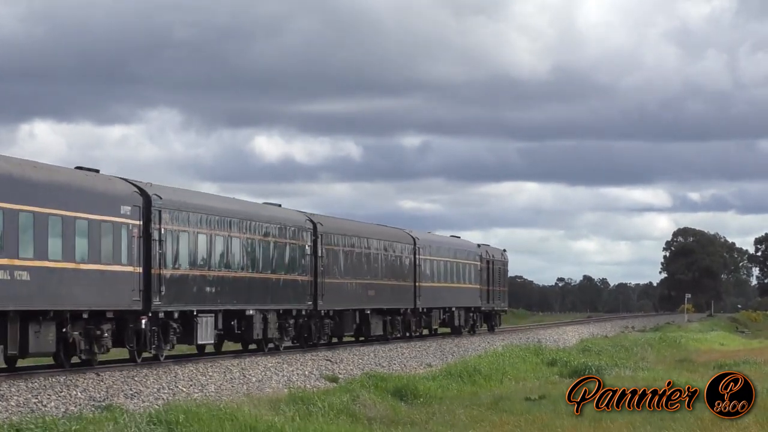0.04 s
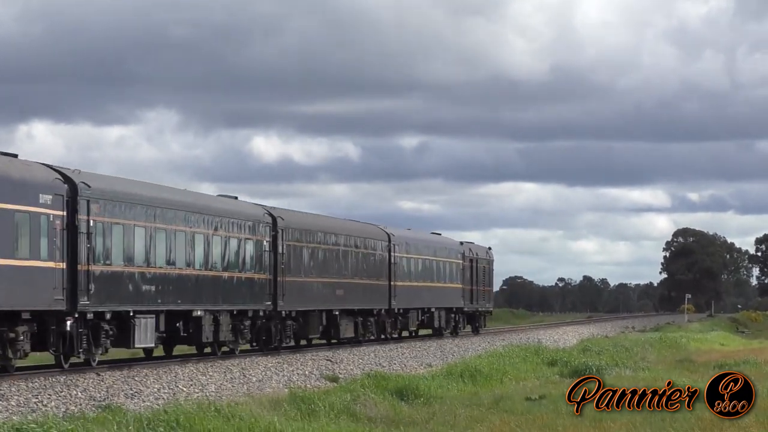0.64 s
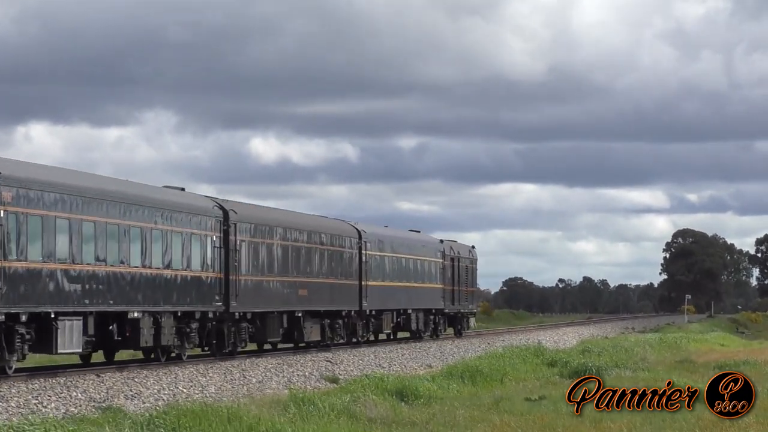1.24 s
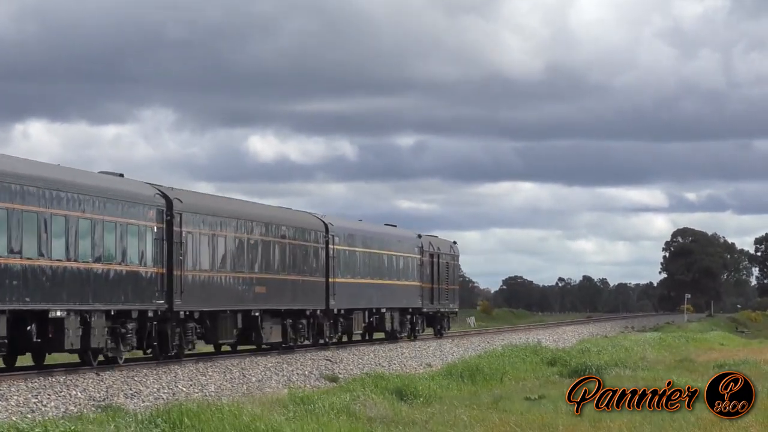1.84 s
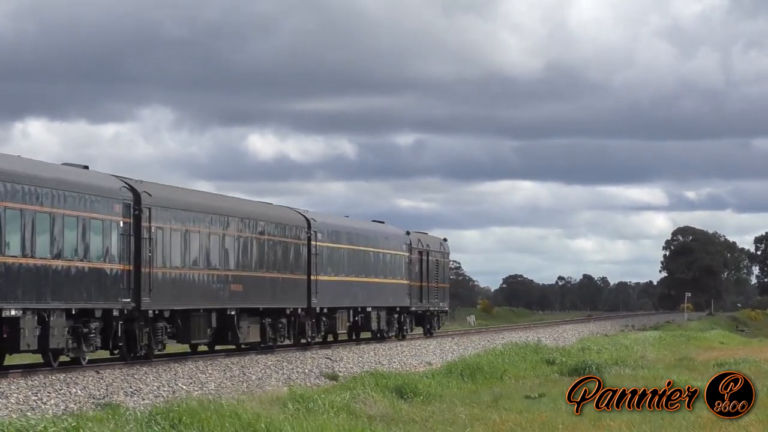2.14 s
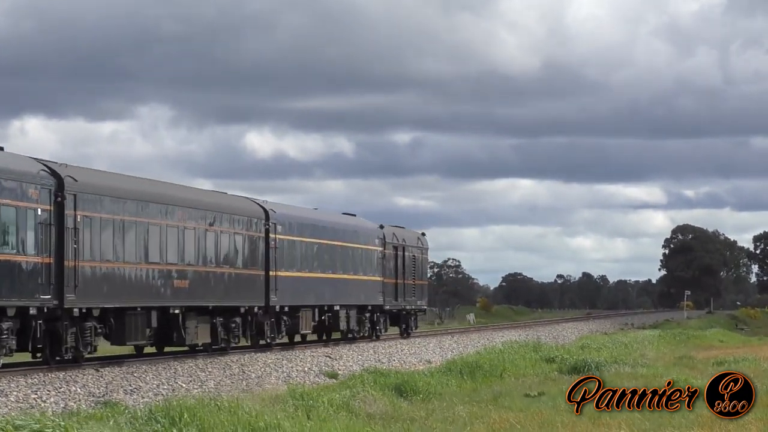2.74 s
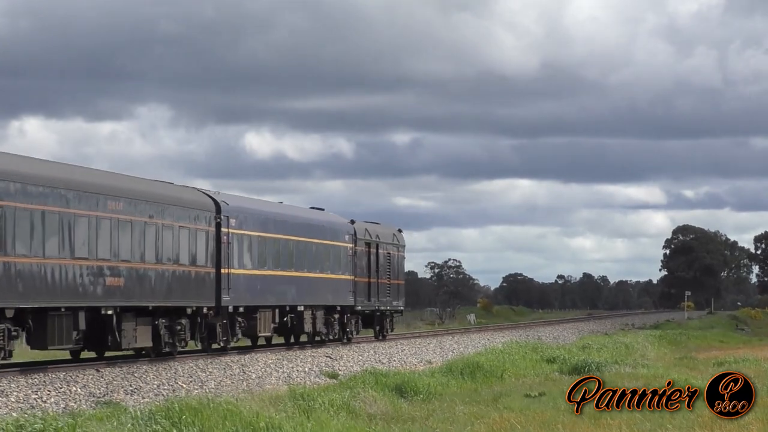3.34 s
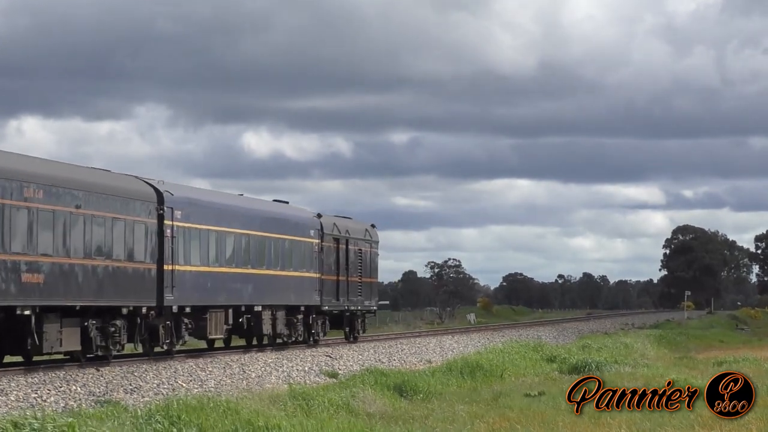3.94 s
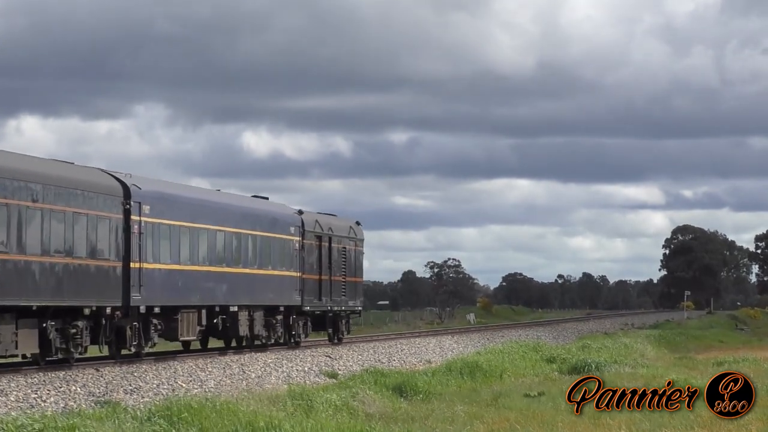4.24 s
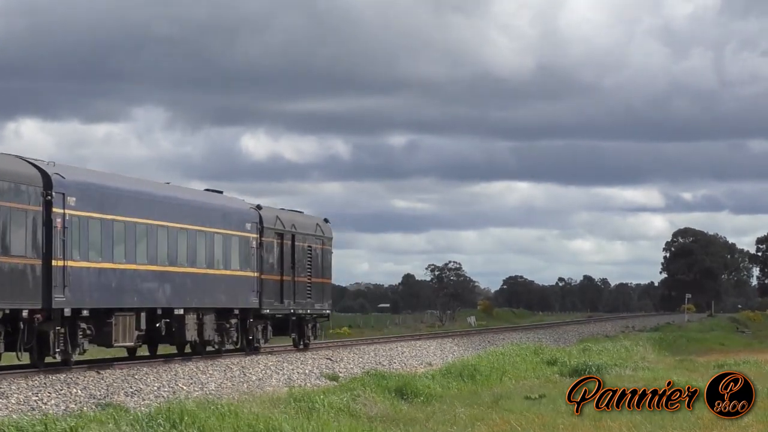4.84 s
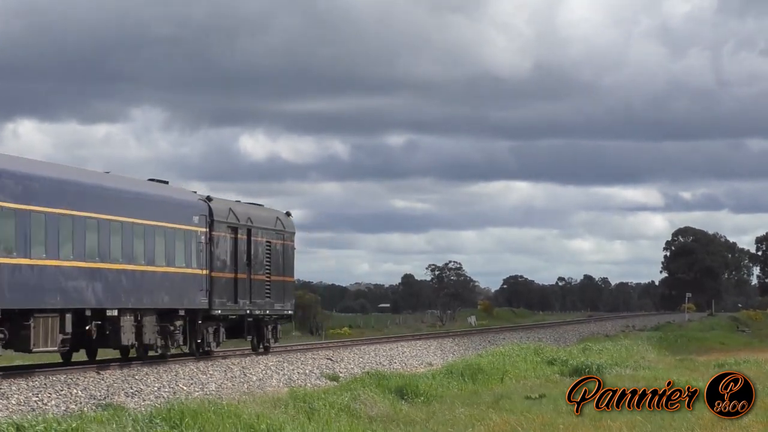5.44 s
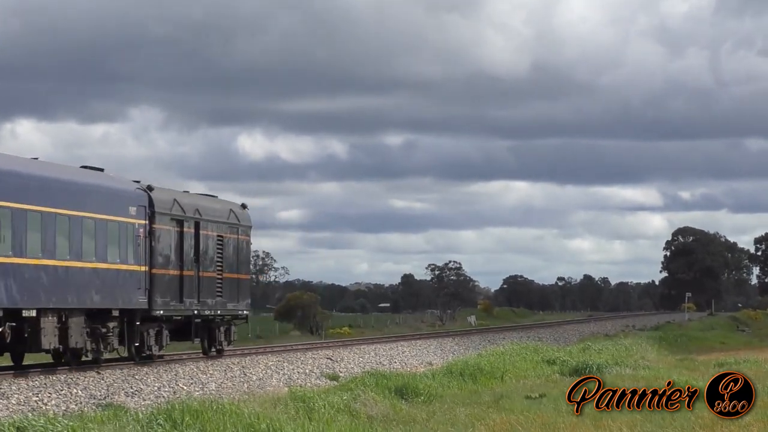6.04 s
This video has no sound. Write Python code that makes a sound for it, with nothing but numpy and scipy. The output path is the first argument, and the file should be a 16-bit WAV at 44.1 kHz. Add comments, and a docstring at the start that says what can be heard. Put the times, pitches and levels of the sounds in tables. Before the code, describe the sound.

Railway carriages roll past on a curve in open farmland, their wheels rumbling and roaring throughout. Clanks, knocks and a brief coupling squeak come first, with faint steel scrapes and clinks. Then the wheels ring thinly on and off, and near the end a flat wheel thumps in a quick, even rhythm. Gusty wind buffets the microphone all along, sometimes overloading it and making the train dip briefly.

```python
"""Open, windy farmland: railway carriages roll past on a curve.
Rough wheels roar and ring on the rails, knock over joints and sing thinly at the flanges.
Bogies clank, a coupling squeaks, steel scrapes, brake rigging clinks, a flat wheel thumps.
Wind buffets the microphone: the hardest eddies overload it and make its limiter duck the train."""
import sys
import numpy as np
from scipy import signal
from scipy.fft import rfft, irfft
from scipy.io import wavfile
from scipy.ndimage import uniform_filter1d, minimum_filter1d

SR = 44100
rng = np.random.default_rng(int(sys.argv[2]) if len(sys.argv) > 2 else 0)


def to_wav(sig):
    """Store sig (one row per channel, or 1-D mono) as 16-bit WAV at the path in sys.argv[1].

    Samples outside -1..1 are clipped; the rate is SR.
    """
    pcm = np.clip(np.atleast_2d(sig), -1, 1) * 32767
    pcm = np.round(pcm).astype(np.int16)
    wavfile.write(sys.argv[1], SR, pcm.T)  # frames by channels


N = 269451
TIME = np.arange(N) / SR

# Carriage body modes. Each row: frequency in Hz, relative level in dB, t60 in seconds.
BODY_MODES = [(154, -7, 0.22), (220.3, -3, 0.19), (248.5, 0, 0.14), (320, -4.5, 0.096), (424.6, -6.5, .15),
              (810, -21, .12), (1240, -21, .075)]


def gain_of(db):
    """Decibels to amplitude."""
    return 10 ** (np.asarray(db) / 20)


def unit_rms(x):
    """Scale to rms 1."""
    return x / np.sqrt(np.mean(x ** 2) + 1e-20)


def spectrum_at(points, hz):
    """Interpolate (Hz, value) points over log frequency."""
    point_hz, value = np.transpose(points)
    return np.interp(np.log(hz + 1), np.log(point_hz + 1), value)


def curve_at(points, t):
    """Interpolate (seconds, value) points."""
    return np.interp(t, *np.transpose(points))


def add(mix, start_s, sound):
    """Mix a sound in, trimmed to fit."""
    start = round(start_s * SR)
    sound = sound[max(-start, 0):]
    part = mix[max(start, 0):][:len(sound)]
    part += sound[:len(part)]


def wander(size, rate_hz):
    """Noise of rms 1, rolled off above rate_hz."""
    hz = np.fft.rfftfreq(size, 1 / SR)
    return unit_rms(irfft(rfft(rng.standard_normal(size)) / (1 + (hz / rate_hz) ** 2), size))


def drift(frames, columns, span):
    """Columns of noise of rms 1, changing over about span frames."""
    noise = rng.standard_normal((frames, columns))
    for _ in range(2):
        noise = uniform_filter1d(noise, size=span, axis=0, mode="wrap")
    return unit_rms(noise)


def fuzzy_tone(t, hz, width_hz):
    """Noise-driven resonance, rms about 1."""
    phase = 2 * np.pi * hz * t
    return wander(len(t), width_hz / 2) * np.cos(phase) + wander(len(t), width_hz / 2) * np.sin(phase)


def rubbing(events, flicker_db, grip_hz=22):
    """Rubbing steel swells and fades in one band, catching and letting go."""
    out = np.zeros(N)
    for middle_s, length_s, hz, width_hz, db in events:
        t = np.arange(0, length_s, 1 / SR)
        swell = gain_of(db) * np.sin(np.pi * t / length_s)
        grip = unit_rms(gain_of(flicker_db * wander(len(t), grip_hz)))
        add(out, middle_s - length_s / 2, swell * grip * fuzzy_tone(t, hz, width_hz))
    return out


def blows(events, modes, width_hz, rise_s, rattle_share=1):
    """Each blow excites the same decaying modes: part firm ring, part loose rattle."""
    out, t = np.zeros(N), np.arange(SR // 4) / SR
    norm = np.linalg.norm([gain_of(db) for _, db, _ in modes])
    onset = 1 - np.exp(-t / rise_s)
    for start_s, level_db in events:
        ring = 0
        for hz, db, t60_s in modes:
            detuned_hz = hz + rng.uniform(-0.71, 0.43) * width_hz / 2
            firm = np.sqrt(2 * (1 - rattle_share)) * np.sin(2 * np.pi * detuned_hz * t)
            loose = np.sqrt(rattle_share) * fuzzy_tone(t, hz, width_hz)
            ring = ring + gain_of(db - 60 * t / t60_s) * (firm + loose)
        add(out, start_s, gain_of(level_db) * ring / norm * onset)
    return out


def passing_levels_db(t, bogie_gap_s=0.19, falloff_power=2.3):
    """Rumble, roar and hiss levels: bogies fade fast with distance, as wheels radiate mostly sideways."""
    # Rest of the train, further off: rumble, roar and hiss in dB.
    distant_db = [-32, -35.5, -57.5]
    # Carriage ends, two bogies each. Each row: nearest time and half swell length in seconds,
    # then body rumble, wheel roar and rail hiss in dB.
    carriage_ends = [(.3, 0.13, -31, -32, -58), (1.052, 0.2, -28.5, -33, -57),
                     (3.33, 0.2, -29.5, -36.5, -63.5), (4.99, 0.31, -28, -35.5, -61.5),
                     (6.0, 0.16, -28.5, -36, -59.5)]
    power = gain_of(distant_db)[:, None] ** 2
    for middle_s, half_s, *level_db in carriage_ends:
        for nearest_s in (middle_s - bogie_gap_s / 2, middle_s + bogie_gap_s / 2):
            distance = np.hypot(1, (t - nearest_s) / half_s / 2)
            power = power + (gain_of(level_db)[:, None] / distance ** falloff_power) ** 2
    return 10 * np.log10(power)


def rolling_colour(t, hz, lift_sway=0.12, pitch_sway=0.0057, ripple_db=3.5):
    """Gain per frame and frequency: wheel and rail resonances waver as the contact point wanders."""
    # Spectra of leading and trailing bogies. Each row: frequency in Hz, relative density in dB.
    leading_spectrum = [(90, 0), (170, -0.5), (350, -10.5), (600, -13), (900, -10.5), (1500, -15),
                        (2200, -19.5), (3000, -24), (4000, -29.5), (5300, -33.5), (6500, -39), (8200, -42),
                        (10500, -44), (14000, -52.5)]
    trailing_spectrum = [(90, -1.5), (220, 0), (350, -7.5), (600, -12), (900, -13), (1500, -14),
                         (2200, -21), (3000, -31), (4000, -34.5), (5300, -41.5), (6500, -48.5), (8200, -54),
                         (10500, -58), (14000, -68)]
    # Blend of the two. Each row: time in seconds, leading share 0-1.
    leading_share = [(0, 0.95), (1.2, 0.95), (1.5, 0.37), (2.3, 0.3), (2.8, 0.05), (4.5, 0.13), (6.1, 0.24)]
    # Resonances. Each row: centre and width in Hz, leading and trailing lift in dB at strength 1.
    resonances = [(429, 138, 2, 5.5), (604, 370, 0, 0.5), (786, 94, 4.5, 0.5), (1290, 140, 2.5, -3),
                  (1560, 150, 1.5, 4), (1840, 140, 0.5, -1), (2054, 75, 3.5, 6), (2270, 150, 1.5, -0.5),
                  (2600, 64, -1, 6), (2810, 150, -1, 4.5), (3200, 160, -0.5, -3.5), (3570, 180, 3.5, 1.5),
                  (4035, 300, 3, -5.5), (7440, 250, 0, -0.5)]
    # Each row: time in seconds, resonance strength.
    resonance_strength = [(0, 0.86), (2.8, 0.86), (3.15, 1.15), (3.4, 0.88), (3.8, 0.84), (4.5, 0.76),
                          (4.85, 1.2), (5.3, 1.16), (6.1, 0.74)]
    leading_db, trailing_db = spectrum_at(leading_spectrum, hz), spectrum_at(trailing_spectrum, hz)
    strength = curve_at(resonance_strength, t)[:, None]
    for centre_hz, width_hz, lead_lift_db, trail_lift_db in resonances:
        sway, shift = drift(len(t), 2, span=24).T[:, :, None]
        offset_hz = hz - centre_hz * (1 + pitch_sway * shift)
        bell = strength * (1 + lift_sway * sway) * np.exp(-2 * (offset_hz / width_hz) ** 2)
        leading_db = leading_db + lead_lift_db * bell
        trailing_db = trailing_db + trail_lift_db * bell
    # Weaker modes come and go, rippling the treble.
    trailing_db = trailing_db + ripple_db * drift(len(t), len(hz), span=60) * hz / (hz + 1500)
    share = curve_at(leading_share, t)[:, None]
    return gain_of(share * leading_db + (1 - share) * trailing_db)


def rolling(patchy_db=1.0, flutter_db=0.73, flutter_hz=19):
    """Rough treads shake bodies, wheels and rails; each sets the level of its own band."""
    size, hop = 1024, 256
    hz, t = np.fft.rfftfreq(size, 1 / SR), np.arange(N // hop + 5) * hop / SR
    colour = rolling_colour(t, hz)
    # Rumble, roar, hiss. Each row: low and high edge in Hz, crossfade as (Hz, weight) points.
    bands = [(170, 550, [(350, 1), (750, 0)]),
             (600, 2500, [(350, 0), (750, 1), (2000, 1), (4200, 0)]),
             (4200, 6000, [(2000, 0), (4200, 1)])]
    eq_db = 0
    for level_db, (low_hz, high_hz, crossfade) in zip(passing_levels_db(t), bands):
        band_power = (colour[:, (hz > low_hz) & (hz < high_hz)] ** 2).sum(1)
        lift_db = level_db - 10 * np.log10(band_power)
        eq_db = eq_db + lift_db[:, None] * spectrum_at(crossfade, hz)
    patches = uniform_filter1d(rng.standard_normal(eq_db.shape), size=9, axis=0)
    patches = unit_rms(uniform_filter1d(patches, size=12, axis=1))
    spectra = rng.standard_normal(eq_db.shape) + 1j * rng.standard_normal(eq_db.shape)
    spectra *= colour * gain_of(eq_db + patchy_db * patches)
    roar = signal.istft(spectra.T, nperseg=size, noverlap=size - hop)[1][:N]
    return np.sqrt(3 / 2) * roar * gain_of(flutter_db * wander(N, flutter_hz))


def wind(gust_churn_db=-8.5, rate_sway=0.38, wake_half_s=0.034, wake_db=-12.5):
    """Turbulence presses on the microphone; gusts buffet it; hard eddies push, then pull."""
    # Turbulence spectrum. Each row: frequency in Hz, relative density in dB.
    churn_spectrum = [(4, -12.5), (11, -3), (22, -0.5), (35, -6), (50, -8.5), (70, -11.5), (100, -16.5),
                      (140, -23), (220, -30.5), (500, -46), (1500, -78), (15000, -140)]
    # Each row: time in seconds, level in dB.
    breeze = [(0, -13.5), (.45, -17.5), (.85, -18.5), (1.3, -13), (2.0, -13.5), (2.25, -21.5), (2.6, -15.5),
              (3.0, -18), (3.4, -12.5), (4.0, -15), (4.65, -15), (5.3, -14.5), (5.6, -14), (6.11, -15.5)]
    # Each row: middle and half length in seconds, peak in dB, buffeting rate in Hz.
    gusts = [(0.317, 0.045, -7.5, 23.56), (0.575, 0.031, -5, 32.54), (0.647, 0.041, -6.5, 22.34),
             (1.067, 0.029, -7.5, 31.65), (1.133, 0.033, -15.5, 62.9), (1.246, 0.034, -6.5, 43.1),
             (1.32, 0.037, -8, 22), (1.568, 0.032, -6.5, 34.45), (1.771, 0.016, -12, 41.6),
             (2.115, 0.031, -12, 69.6), (2.199, 0.024, -2.5, 25.4), (2.337, 0.035, -3, 24.6),
             (2.414, 0.018, -6.5, 72.5), (2.568, 0.013, -4.5, 24.34), (2.805, 0.03, -7.5, 31.1),
             (3.16, 0.018, -12.5, 39), (3.351, 0.012, -9, 25.5), (3.481, 0.026, -7.5, 33.5),
             (3.576, 0.011, -7, 55.24), (3.767, 0.01, -6.5, 33.9), (3.831, 0.02, -6, 25.3),
             (3.984, 0.032, -7, 22.8), (4.216, 0.051, -10, 28.4), (4.3, 0.039, -8, 22.5),
             (4.786, 0.038, -10, 24.6), (5.021, 0.022, -6, 24.9), (5.091, 0.024, -9, 54.9),
             (5.288, .022, -7, 27.64), (5.412, 0.025, -5, 29.9), (5.511, 0.028, -8.5, 45.1),
             (5.73, 0.012, -5.5, 35.15), (5.932, 0.032, -11.5, 49), (6.074, 0.028, -7.5, 61.35)]
    # Each row: middle and half length in seconds, push and pull in dB re full scale.
    eddies = [(1.383, 0.0084, 0, 0.5), (1.843, 0.008, 7.5, 6), (2.3137, 0.0083, 1, 1.5),
              (2.436, 0.0048, 1.5, -4), (2.602, 0.0065, 2.5, 3), (2.6378, 0.0056, 2, 3),
              (2.659, 0.0044, 2, -15), (3.602, 0.0062, 6.5, 0), (3.632, 0.0039, 0, -12),
              (3.689, .007, 4.5, 2), (3.926, 0.0065, -4, -1), (4.428, 0.0091, -0.5, -1),
              (5.469, 0.0066, -2.5, 0)]
    colour = gain_of(spectrum_at(churn_spectrum, np.fft.rfftfreq(N, 1 / SR)))
    churn = unit_rms(irfft(rfft(rng.standard_normal(N)) * colour, N))
    churn = churn / np.sqrt(uniform_filter1d(churn ** 2, size=4000) + 0.01)  # even out slow swells
    power, buffets = gain_of(curve_at(breeze, TIME)) ** 2, np.zeros(N)
    t = np.arange(-SR // 5, SR // 5) / SR
    for middle_s, half_s, db, rate_hz in gusts:
        swell = gain_of(db) * np.exp(-(t / half_s) ** 2 / 2)
        cycles = rng.random() + np.cumsum(rate_hz * (1 + rate_sway * wander(len(t), 39.7))) / SR
        add(buffets, middle_s + t[0], swell * np.sin(2 * np.pi * cycles))
        add(power, middle_s + t[0], (swell * gain_of(gust_churn_db)) ** 2)
    for middle_s, _, push_db, _ in eddies:  # each rides in its own turbulence
        power += gain_of(push_db + wake_db) ** 2 * np.exp(-((TIME - middle_s) / wake_half_s) ** 2)
    turbulence, shoves = churn * np.sqrt(power) + buffets, np.zeros(N)
    for middle_s, half_s, push_db, pull_db in eddies:
        u = (TIME - middle_s) / half_s
        turbulence *= 1 - np.exp(-(u / 2) ** 2 / 2)  # swept aside by the eddy
        peak = np.where(u < 0, gain_of(push_db), gain_of(pull_db))
        shoves -= peak * u * np.exp((1 - u ** 2) / 2)
    return turbulence + shoves


def thin_singing():
    """Rubbing steel sings in thin, high bands: the coupling squeak's overtones, and wheel flanges."""
    # Each row: middle and length in seconds, centre and width in Hz, level in dB.
    # Rows at 0.335, 0.41 and 0.52 s: upper overtones and tail of the coupling squeak, near 6 kHz.
    # Other rows: flanges on the curve.
    thin_tones = [(0.09, 0.37, 3900, 160, -55), (.335, .04, 5950, 120, -56), (.41, .15, 6330, 110, -57.5),
                  (.52, .15, 6200, 110, -60), (1.06, .28, 7445, 130, -61), (1.217, 0.062, 4040, 80, -47),
                  (1.27, 0.14, 6993, 120, -58), (1.55, 0.69, 9030, 110, -72), (1.94, 0.15, 7880, 60, -75),
                  (2.13, 0.36, 9030, 220, -68), (2.53, 0.13, 8950, 200, -64), (2.82, 0.22, 8850, 130, -73),
                  (3.42, .32, 8760, 110, -72), (5.11, 0.1, 5760, 150, -59)]
    return rubbing(thin_tones, flicker_db=2.0)


def joint_knocks():
    """Wheels knock over joints and sound the carriage body."""
    # Each row: start in seconds, level in dB.
    knocks = [(.125, -23.5), (.995, -18), (1.129, -19.5), (3.244, -26), (3.43, -23.5), (4.542, -20.5)]
    return blows(knocks, BODY_MODES, width_hz=28, rise_s=0.0028, rattle_share=0.23)


def bogie_clanks():
    """Bogie frames clank over the track."""
    # Each row: start in seconds, level in dB.
    clanks = [(.156, -35), (.195, -28), (.255, -26.5), (.46, -24), (.692, -22), (.82, -35), (.9, -29),
              (.964, -27), (1.453, -36)]
    # Each row: frequency in Hz, relative level in dB, t60 in seconds.
    frame_modes = [(750, 3.5, 0.1), (843, -12, 0.23), (958, -6, 0.073), (1185, -3, 0.13), (1377, -5, 0.14),
                   (2150, -12, 0.12)]
    return blows(clanks, frame_modes, width_hz=140, rise_s=0.002)


def coupling_squeaks(jitter=0.06, jitter_hz=320, flicker_db=2.5, scatter_db=-6, scatter_t60_s=0.19):
    """Dry steel sticks and slips: pitch and level arch, and the sound scatters under the carriage."""
    # Each row: middle and length in seconds, mid pitch in Hz, downward slide per half length
    # as a share of pitch, level in dB, roughness 0-1.
    squeaks = [(.257, 0.15, 3310, 0.0423, -34.5, 0.54), (.485, .12, 3220, .05, -44.5, .74),
               (0.547, .085, 2940, 0.073, -41.5, .58)]
    # Each row: multiple of the pitch, relative level in dB.
    harmonics = [(1, 0.5), (2, -19), (3, -19), (4, -26)]
    end_sag, loudest_at = 0.052, 0.47  # shares of pitch, of length
    direct = np.zeros(N)
    for middle_s, length_s, mid_hz, slide, level_db, roughness in squeaks:
        t = np.arange(0, length_s, 1 / SR)
        u = 2 * t / length_s - 1
        hz = mid_hz * (1 - end_sag * u ** 2 - slide * u)
        swell = np.sin(np.pi / 2 * np.interp(t / length_s, [0, loudest_at, 1], [0, 1, 0])) ** 2
        cycles = np.cumsum(hz * (1 + jitter * roughness ** 2 * wander(len(t), jitter_hz))) / SR
        tone = np.zeros(len(t))
        for order, db in harmonics:
            tone += gain_of(db + flicker_db * wander(len(t), 130)) * np.sin(2 * np.pi * order * cycles)
        add(direct, middle_s - length_s / 2, unit_rms(tone) * gain_of(level_db) * swell)
    echoes = rng.standard_normal(SR // 4) * gain_of(-60 * TIME[:SR // 4] / scatter_t60_s)
    scattered = signal.fftconvolve(direct, echoes / np.linalg.norm(echoes))[:N]
    return direct + gain_of(scatter_db) * scattered


def steel_scrapes():
    """Steel scrapes without catching a tone: a broad hiss."""
    # Each row: middle and length in seconds, centre and width in Hz, level in dB.
    scrapes = [(.43, .22, 9800, 1100, -62), (1.265, 0.08, 4500, 3000, -50.5), (1.47, .2, 13300, 3500, -70),
               (1.66, 0.39, 11500, 5000, -70), (1.80, .07, 9200, 1400, -61), (2.1, .26, 9700, 2200, -67),
               (2.275, 0.03, 5140, 3000, -53), (4.8, .06, 7100, 2400, -59)]
    return rubbing(scrapes, flicker_db=2.2)


def rigging_clinks():
    """Loose brake rigging and chains clink."""
    # Each row: start in seconds, level in dB.
    clinks = [(.883, -46), (.952, -40), (1.247, -34.5), (1.778, -46), (3.03, -44), (3.465, -47)]
    # Each row: frequency in Hz, relative level in dB, t60 in seconds.
    rigging_modes = [(2820, -7, .09), (3200, 4, 0.24), (4300, -1, 0.091), (5050, -2, 0.086),
                     (5300, 0, 0.059), (5960, -7, .08), (7060, -4, 0.15), (8000, -15, .08),
                     (9700, -9, 0.089)]
    return blows(clinks, rigging_modes, width_hz=930, rise_s=0.0013)


def wheel_rings():
    """A wheel rings as it is pressed round the curve."""
    # Each row: middle and length in seconds, centre and width in Hz, level in dB.
    rings = [(2.15, 0.21, 1573, 120, -42.5), (2.53, 0.11, 1570, 90, -43), (2.82, .17, 1570, 60, -37),
             (2.94, .12, 1555, 60, -42), (3.25, .3, 1560, 90, -45), (3.5, 0.19, 1560, 80, -41),
             (4.38, 0.091, 1570, 80, -40), (4.95, .22, 1595, 110, -36), (5.17, .25, 1570, 100, -44),
             (5.36, .2, 1570, 100, -38)]
    return rubbing(rings, flicker_db=2.0)


def wheel_jolts():
    """The last wheels strike rail joints and sound their own modes."""
    # Each row: start in seconds, level in dB.
    jolts = [(3.44, -28), (4.82, -31), (4.885, -27), (4.95, -25), (5.375, -25), (5.995, -30)]
    # Each row: frequency in Hz, relative level in dB, t60 in seconds.
    wheel_modes = [(1136, -4.5, 0.11), (1517, -2, 0.084), (2010, -11, 0.16), (2530, -13.5, 0.22),
                   (2920, -15, .2)]
    return blows(jolts, wheel_modes, width_hz=88, rise_s=0.0064)


def flat_wheel(start_s=4.697, turn_s=0.2515):
    """A flat spot thumps the carriage body once a turn."""
    # Level of each thump in dB.
    thump_db = [-14, -15.5, -11, -18.5, -17, -18]
    thumps = [(start_s + turn * turn_s, db) for turn, db in enumerate(thump_db)]
    return blows(thumps, BODY_MODES, width_hz=28, rise_s=0.0028, rattle_share=0.23)


def scene():
    """Train and wind in the open, mono."""
    impacts = joint_knocks() + flat_wheel() + bogie_clanks() + wheel_jolts() + rigging_clinks()
    friction = coupling_squeaks() + wheel_rings() + thin_singing() + steel_scrapes()
    return (rolling() + friction + impacts + wind())[None]


def record(dry, threshold_db=-3.5, hold_s=0.018, recovery_db_per_s=90, attack_s=0.0006):
    """Input clipping, low cut, a limiter that ducks, holds and recovers, then a band limit."""
    low_cut_hz, high_cut_hz = 9.9, 14850
    # While wind pins the input at full scale, the train cuts out.
    clipped = dry / (1 + dry ** 40) ** (1 / 40)
    drooped = signal.sosfilt(signal.butter(1, low_cut_hz, "high", fs=SR, output="sos"), clipped)
    over_db = np.maximum(20 * np.log10(abs(drooped[0]) + 1e-9) - threshold_db, 0)
    hold = round(hold_s * SR)
    held_db = -minimum_filter1d(-over_db, size=hold, origin=(hold - 1) // 2)
    recovery_db = TIME * recovery_db_per_s
    duck_db = np.maximum.accumulate(held_db + recovery_db) - recovery_db
    pole = np.exp(-1 / (attack_s * SR))
    ducked = drooped / gain_of(signal.lfilter([1 - pole], [1, -pole], duck_db))
    faded = ducked * signal.windows.tukey(N, 0.002)
    return signal.sosfiltfilt(signal.ellip(10, 0.05, 60, high_cut_hz, fs=SR, output="sos"), faded)


dry = scene()
out = record(dry)
to_wav(out)
```